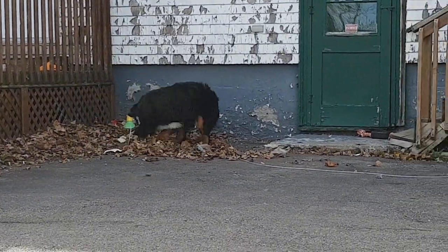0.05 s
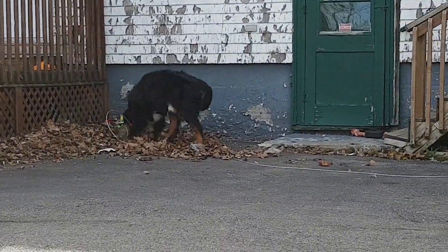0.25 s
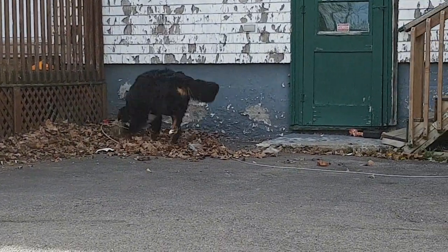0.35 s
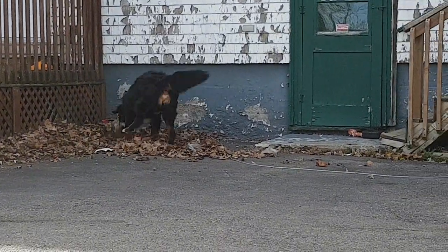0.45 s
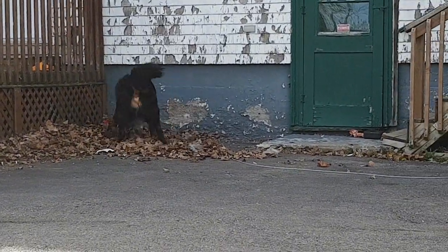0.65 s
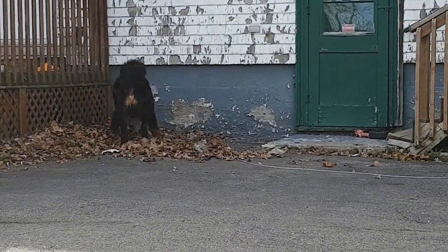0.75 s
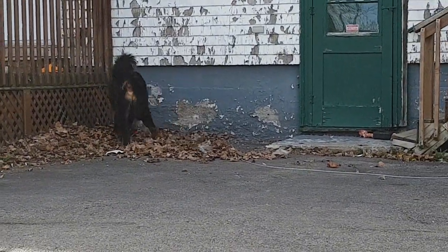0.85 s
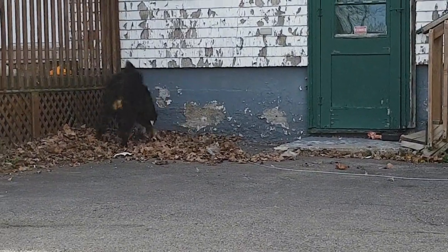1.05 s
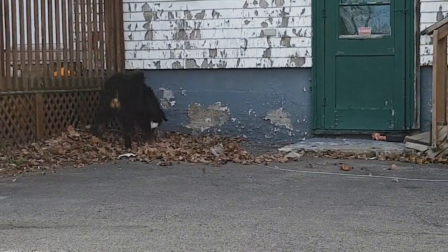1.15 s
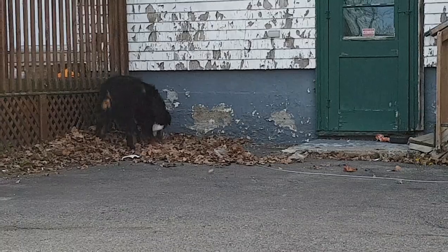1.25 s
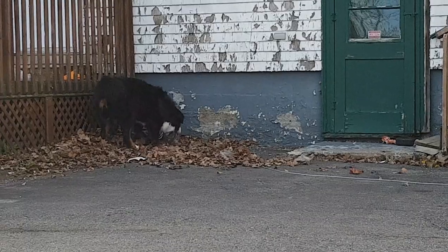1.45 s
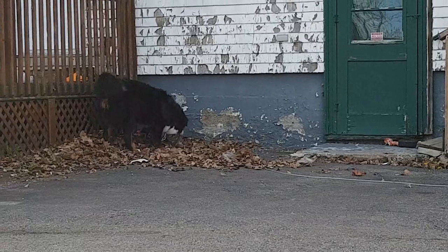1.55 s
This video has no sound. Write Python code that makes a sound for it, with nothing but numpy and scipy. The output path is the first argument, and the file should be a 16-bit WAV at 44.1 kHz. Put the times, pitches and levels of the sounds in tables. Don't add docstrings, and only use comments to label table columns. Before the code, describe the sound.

Dry leaves crunch and snap under a dog's paws, strongest in the first half second, then scattered lighter crackles and soft paw knocks; outdoors by a wall, some metres from a muffled microphone.

```python
import sys
import numpy as np
from scipy import signal
from scipy.io import wavfile

SR = 44100
rng = np.random.default_rng(int(sys.argv[2]) if len(sys.argv) > 2 else 0)


def nominal_scale(level):
    x = np.asarray(level, float) / 20
    return 10 ** x


def wav_out(sig):
    wavfile.write(sys.argv[1], SR, np.round(np.clip(np.atleast_2d(sig).T, -1, 1) * 32767).astype(np.int16))


N = 70560
BURST = SR // 5
CREASES_PER_S = 1800


def rms_one(x):
    return x / np.sqrt(np.mean(x ** 2) + 1e-20)


def in_time(rows):
    s, *columns = np.transpose(rows)
    return [np.interp(np.arange(N) / SR, s, c) for c in columns]


def at_hz(points, hz):
    table_hz, value = np.transpose(points)
    return np.interp(np.log(hz), np.log(table_hz), value)


def drift(rate_hz):
    r = np.exp(-80 * np.pi * rate_hz / SR)
    slow = signal.lfilter([1], [1, -2 * r, r * r], rng.standard_normal(N // 40 + 2002))[2000:]
    return np.interp(np.arange(N) / 40, np.arange(len(slow)), rms_one(slow))


def resonance(x, hz, width_hz):
    r = np.exp(-np.pi * width_hz / SR)
    poles = [1, -2 * r * np.cos(2 * np.pi * hz / SR), r * r]
    return signal.lfilter([(1 - r * r) / 2, 0, (r * r - 1) / 2], poles, x + 1e-18)


def double_resonance(x, hz, width_hz, second_width_hz):
    return resonance(resonance(x, hz, width_hz), hz, second_width_hz)


def decay(t60_s):
    return nominal_scale(-60 * np.arange(BURST) / SR / max(t60_s, 0.01))


def place(out, start_s, peak_db, sound):
    start = int(start_s * SR)
    out[start:start + len(sound)] += nominal_scale(peak_db) * sound / np.abs(sound).max()


def muffle(x):
    x = x + nominal_scale(-0.5) * resonance(x, 2065, 180)
    return signal.sosfilt(signal.butter(6, 2063, fs=SR, output="sos"), x)


def creases(per_s, size):
    spread_db = 2
    sizes = nominal_scale(spread_db * np.minimum(rng.exponential(1, size), 3.5)) * rng.choice([-1, 1], size)
    return sizes * (rng.random(size) < per_s / SR)


def crunch():
    # start_s, level_db, bright_db (per octave)
    push_curve = [(0, -60, -15), (.05, -59, -4), (.06, -45, -7), (.19, -71, -15), (.21, -40, 1),
                  (.3, -23, -3), (.335, -32.5, 1), (.372, -44, 4.5), (.39, -29.5, 4.5), (.49, -25.5, 0),
                  (.575, -29.5, 0.8), (.6, -45, 4), (.72, -49.5, -1), (.8, -58, 2.5), (1.0, -57, 4),
                  (1.15, -50.5, -6.5), (1.35, -49.5, -1), (1.6, -57.5, -8)]
    # hz, level_db
    colour = [(88, -37), (150, -9.5), (483, -3), (683, -2.5), (798, -2.5), (1410, -14.5), (2020, -16.5),
              (2600, -18), (3380, -57), (5720, -120)]
    grains_per_s, grain_cycles, leaf_sizes = 6000, 6.25, 24
    level_db, bright_db = in_time(push_curve)
    clicks = creases(grains_per_s * nominal_scale(3.1 * drift(30)), N)
    leaf = rng.integers(0, leaf_sizes, N)
    out = 0
    for k, hz in enumerate(np.geomspace(160, 2500, leaf_sizes)):
        ring = rms_one(double_resonance(clicks * (leaf == k), hz, 2.0 * hz / grain_cycles, 0.95 * hz))
        gain = nominal_scale(at_hz(colour, hz) + bright_db * np.log2(hz / 500)) * np.sqrt(hz / 500)
        out = out + gain * ring
    return nominal_scale(level_db - 12.5) * muffle(out)


def crackle(events):
    rise_s, crack_db, body_cycles, edge_db, edge_t60_s = 0.002, 20, 6.3, -6, 0.02
    out = np.zeros(N + SR)
    swell = np.minimum(np.arange(BURST) / SR / rise_s, 1) ** 2
    for start_s, peak_db, hz, t60_s in events:
        run = rms_one(creases(CREASES_PER_S, BURST))
        run[int(rise_s * SR)] = nominal_scale(crack_db)
        run = run * swell
        width_hz, edge_width_hz = 1.88 * hz / body_cycles, 1.85 * hz
        body = rms_one(double_resonance(run * decay(t60_s), hz, width_hz, 3.05 * width_hz))
        edge = rms_one(double_resonance(run * decay(edge_t60_s), 1.12 * hz, edge_width_hz, edge_width_hz))
        place(out, start_s, peak_db, muffle(body + nominal_scale(edge_db) * edge))
    return out[:N]


def snaps():
    # start_s, peak_db, pitch_hz, t60_s
    snap_events = [(.055, -34.5, 319, 0.056), (.2, -28, 520, .05), (.237, -30.5, 480, 0.078),
                   (.273, -20, 1065, 0.057), (0.288, -12.5, 815, 0.028), (.387, -13, 520, 0.05),
                   (.424, -10.5, 1000, 0.058), (0.447, -24.5, 875, 0.045), (.471, -24.5, 2000, 0.036),
                   (0.497, -8, 900, 0.046), (.552, -23, 1808, 0.067), (.569, -25, 780, 0.038),
                   (0.814, -21, 1165, 0.05), (0.926, -31.5, 680, 0.05), (1.037, -29.5, 1110, 0.032),
                   (1.073, -29, 1000, 0.087), (1.111, -29, 450, 0.068), (1.139, -30, 320, 0.058),
                   (1.2585, -18, 1900, 0.06), (1.31, -16.5, 1110, 0.071)]
    return crackle(snap_events)


def paws():
    # start_s, peak_db, pitch_hz, t60_s
    paw_events = [(.103, -27, 208, 0.045), (0.21, -26, 340, 0.043), (.53, -24.5, 410, 0.064),
                  (0.62, -26, 260, 0.13), (.834, -24.5, 640, 0.12), (1.258, -29.5, 323, 0.05),
                  (1.254, -19, 690, 0.069), (1.312, -23, 760, 0.06), (0.87, -45, 2300, 0.067),
                  (.819, -24, 1400, 0.1), (.822, -29, 350, .08), (1.073, -27.5, 810, .04),
                  (1.32, -32.5, 207, 0.062), (.39, -29.5, 185, 0.075), (.272, -26, 206, 0.048),
                  (0.28, -23.5, 305, 0.11), (1.082, -35.5, 300, 0.042), (0.4, -21, 1200, 0.058)]
    return crackle(paw_events)


def buckles():
    # start_s, peak_db, pitch_hz, t60_s
    buckle_events = [(0.2015, -39.5, 556, 0.026), (0.2373, -33.5, 511, 0.058), (0.2783, -28, 1170, 0.019),
                     (0.2898, -18.5, 844, 0.026), (0.3073, -26, 856, 0.024), (0.3138, -33, 1293, 0.053),
                     (0.315, -29, 220.0, 0.085), (0.316, -29, 496, 0.082), (0.321, -32, 970, 0.022),
                     (0.3883, -17, 870, 0.029), (0.3888, -23.5, 2071, 0.023), (0.389, -24.5, 1450, 0.017),
                     (0.3919, -21.5, 578, 0.065), (0.4064, -29.5, 980.0, 0.026),
                     (0.4133, -30, 2160.0, 0.021), (0.4151, -24.5, 820.0, 0.02),
                     (0.423, -28.5, 1786, 0.029), (0.4243, -23.5, 1083, 0.019), (0.448, -29.5, 597, 0.028),
                     (0.448, -27.5, 960, 0.023), (0.4529, -28.5, 501, 0.077), (0.4729, -32.5, 2080, 0.029),
                     (0.4991, -16, 944, 0.023), (0.4991, -20.5, 522, 0.042), (0.4991, -16, 1850, 0.022),
                     (0.5077, -30, 535.4, 0.14), (0.5113, -27, 575, 0.033), (0.5134, -31.5, 244, 0.17),
                     (0.5159, -38, 943, 0.046), (0.534, -30.5, 1840, 0.019), (0.538, -29, 472, 0.054),
                     (0.556, -28, 574, 0.025), (0.569, -27.5, 765, 0.033), (0.5705, -31, 1710, 0.024),
                     (0.8174, -30, 1200.0, 0.038), (0.8222, -43, 1936, 0.03), (0.8232, -27.5, 556, 0.035),
                     (0.8295, -36.5, 150.4, 0.086), (0.8351, -34, 543, 0.042), (1.0386, -45, 1375, 0.032),
                     (1.0388, -42.5, 980.0, 0.024), (1.0748, -41, 1344, 0.025), (1.0798, -44.5, 885, 0.027),
                     (1.2565, -27, 914, 0.021), (1.2575, -22, 1320, 0.018), (1.2571, -26.5, 1886, 0.027),
                     (1.2716, -38.5, 1317, 0.032), (1.3115, -29.5, 2030, 0.022), (1.3144, -26, 1188, 0.036),
                     (1.3163, -37.5, 470.0, 0.065)]
    gain_db, lead_s, rattle_db = 1.5, 0.001998, -23.5
    out = np.zeros(N + SR)
    for start_s, peak_db, hz, t60_s in buckle_events:
        run = nominal_scale(rattle_db) * rms_one(creases(CREASES_PER_S, BURST)) * decay(t60_s)
        run[0] = rng.choice([-1, 1])
        width_hz = np.log(1000) / np.pi / max(t60_s, 0.01)
        ring = muffle(double_resonance(run, hz, width_hz, 3.7 * width_hz))
        place(out, start_s - lead_s * np.sqrt(800 / hz), peak_db + gain_db, ring)
    return out[:N]


def breaks():
    # start_s, peak_db, centre_hz
    break_events = [(.3884, -11, 1000), (0.4234, -16, 1500), (0.449, -19.5, 1090), (0.4987, -11.5, 1460),
                    (.5012, -13.5, 1510), (0.5067, -21, 1980), (0.8143, -29, 1390), (1.0385, -35, 1200),
                    (1.0748, -33, 1210), (1.0803, -33, 1100), (1.1148, -35.5, 500), (1.2555, -23, 900),
                    (1.258, -18, 1300), (1.3118, -17, 1300)]
    out = np.zeros(N + SR)
    click = np.zeros(SR // 50)
    click[0] = 1
    for start_s, peak_db, hz in break_events:
        width_hz = 1.19 * hz
        place(out, start_s, peak_db, muffle(double_resonance(click, hz, width_hz, width_hz)))
    return out[:N]


def splinters():
    # start_s, peak_db, pitch_hz, t60_s
    splinter_events = [
        (.055, -40, 4450, 0.053),
        (.387, -44, 3240, 0.03),
        (.498, -56, 3300, .05),
        (.816, -57, 3200, .04),
        (1.254, -42.5, 4770, 0.053),
        (1.311, -49, 3300, 0.044),
    ]
    out = np.zeros(N + SR)
    for start_s, peak_db, hz, t60_s in splinter_events:
        run = creases(5000, BURST) * decay(t60_s)
        place(out, start_s, peak_db, double_resonance(run, hz, 0.97 * hz, 0.64 * hz))
    return out[:N]


def wall(x):
    # left_s, right_s
    echo_lags = [
        (.007, 0.0099),
        (.013, 0.017),
        (.021, .018),
    ]
    out = np.zeros((2, N))
    for k, lags_s in enumerate(echo_lags):
        for side, lag_s in enumerate(lags_s):
            lag = int(lag_s * SR)
            out[side, lag:] += nominal_scale(-20 - 1.0 * k) * (-1) ** (side * k) * x[:N - lag]
    return out


def banded_noise(spectrum, patchy_db):
    # hz, likeness (-1 to 1)
    likeness = [(60, 0), (150, 0.66), (400, 0.3), (1100, 0.38), (2000, 0.8), (3000, 0), (4500, 0.19),
                (9000, -.1)]
    out, together = 0, drift(14)
    edges_hz = 22 * 2 ** np.arange(0, 9.8, 1 / 3)
    white = rng.standard_normal((2, 2, N))
    for k, (low, high) in enumerate(zip(edges_hz, edges_hz[1:])):
        hz = np.sqrt(low * high)
        if spectrum[0][0] / 1.5 < hz < spectrum[-1][0] * 1.5:
            band = signal.butter(2, [low, high], "band", fs=SR, output="sos")
            mid, side = signal.sosfilt(band, white[k % 2])
            alike = np.clip(at_hz(likeness, hz), -1, 1)
            gain = nominal_scale(at_hz(spectrum, hz) + patchy_db * (1.3 * together + 0.5 * drift(11.5)))
            out = out + gain * (np.sqrt(1 + alike) * mid + np.sqrt(1 - alike) * side * [[1], [-1]])
    return rms_one(out)


def swish():
    # start_s, level_db
    stir_curve = [(0.0, -57), (0.098, -57), (0.106, -54.5), (0.178, -60), (0.236, -54.5), (0.27, -58),
                  (0.298, -54.5), (0.364, -63.5), (0.386, -57), (0.588, -57.5), (0.64, -66), (0.698, -62),
                  (0.806, -69.5), (0.922, -61.5), (1.188, -64.5), (1.252, -59), (1.438, -70.5), (1.6, -67)]
    # hz, level_db
    colour = [(410, -35), (700, -7), (1500, -4.5), (2130, -3.5), (2630, -16), (4150, -22.5), (5920, -19.5),
              (14800, -26.5), (16000, -30)]
    return nominal_scale(in_time(stir_curve)[0] + 13.5) * banded_noise(colour, patchy_db=1.03)


def tag():
    # start_s, level_db, pitch_hz, length_s
    touches = [(0.012, -60, 7000, 0.033), (0.108, -67, 7000, .02), (.1, -62, 15400, 0.02),
               (0.103, -69, 12100, .025), (0.272, -54, 7000, 0.009), (.295, -60, 14800, .015),
               (0.458, -57.5, 7010, .035), (0.789, -70, 7000, 0.022), (0.863, -61.5, 7000, 0.026),
               (1.078, -75, 12100, 0.017), (1.17, -67, 7000, 0.011)]
    width_hz, fade_s = 160, 0.0013
    out, t = np.zeros((2, N)), np.arange(N) / SR
    for start_s, level_db, hz, length_s in touches:
        gate = np.clip(np.minimum(t - start_s, start_s + length_s - t) / fade_s + 1, 0, 1)
        noise = rng.standard_normal(N) + 0.56 * rng.standard_normal((2, N))
        out += nominal_scale(level_db) * gate * rms_one(double_resonance(noise, hz, width_hz, width_hz))
    return out


def air():
    # start_s, level_db
    gust_curve = [(0.0, -36), (0.022, -60), (0.07, -42), (0.19, -45.5), (0.218, -51), (0.266, -42),
                  (0.386, -64.5), (0.484, -50.5), (0.77, -56), (0.832, -47.5), (1.096, -63.5),
                  (1.118, -57.5), (1.536, -65), (1.6, -74)]
    # hz, level_db
    colour = [(15, -42), (25, -19), (92, -2.5), (120, -8), (264, -17), (500, -24.5), (650, -69),
              (1100, -120)]
    return nominal_scale(in_time(gust_curve)[0] + 3.5) * banded_noise(colour, patchy_db=0.5)


def yard():
    # hz, level_db
    colour = [(18, -33), (30, 3), (157, -1), (280, -2), (328, -3), (404, -10), (1720, -5.5), (4420, -68),
              (16000, -32)]
    return nominal_scale(-54.5) * banded_noise(colour, patchy_db=1.2)


def scene():
    cracks = nominal_scale(-5) * (snaps() + paws()) + buckles() + breaks()
    heap = crunch() + cracks + splinters()
    port_hz = 1000
    slope = np.gradient(cracks) * SR / (2 * np.pi * port_hz)
    side = resonance(nominal_scale(-11.5) * crunch() + nominal_scale(-20.5) * slope, port_hz, 1600)
    side = side + nominal_scale(3) * splinters()
    return heap + side * np.array([[1], [-1]]) + wall(heap) + swish() + tag() + air() + yard()


def band_limit(x):
    return signal.sosfilt(signal.butter(12, 16660, fs=SR, output="sos"), x)


def record(dry):
    # centre_hz, width_hz, level_db
    housing = [(3486, 370, -2.9), (6020, 520, -11.8), (7000, 87, -22), (8730, 220, -2), (12100, 1100, -1.5),
               (15000, 800, 4)]
    x = dry + sum(nominal_scale(db) * resonance(dry, hz, width_hz) for hz, width_hz, db in housing)
    x = signal.sosfilt(signal.ellip(14, 0.5, 68, 15760, fs=SR, output="sos"), x)
    return band_limit(x)


dry = scene()
out = record(dry)
wav_out(out)
```